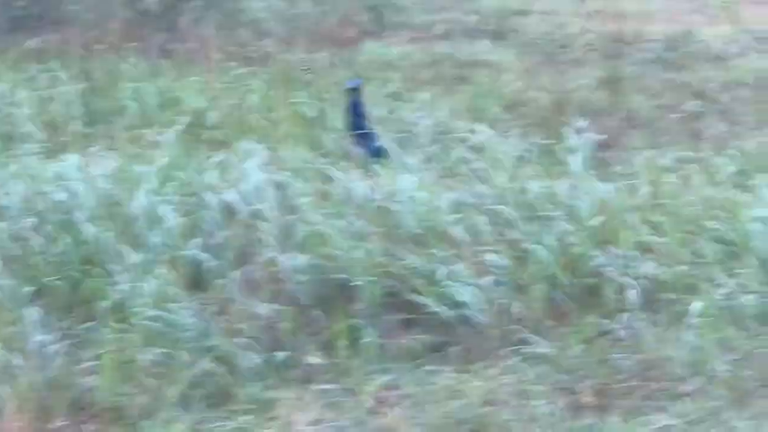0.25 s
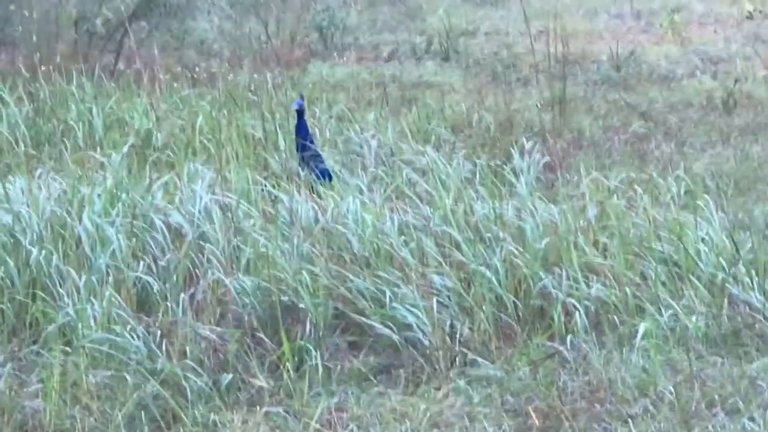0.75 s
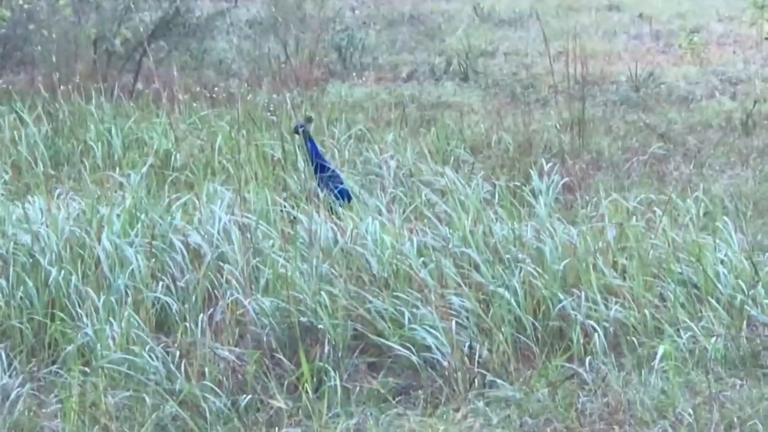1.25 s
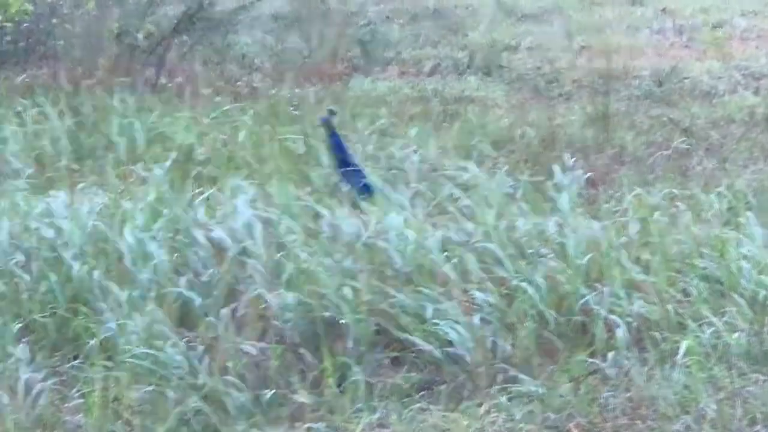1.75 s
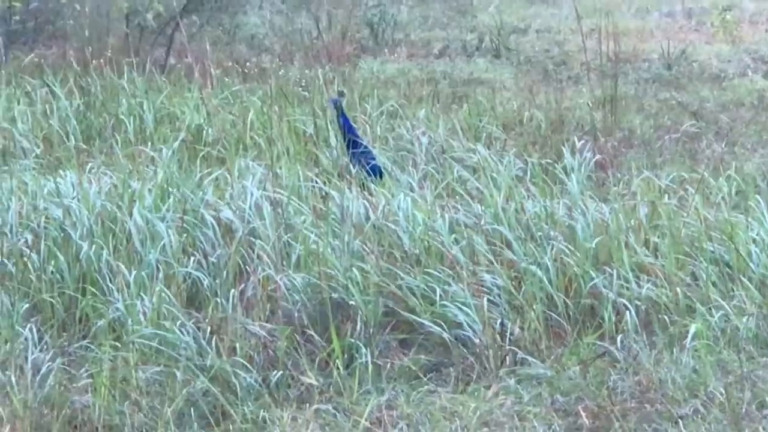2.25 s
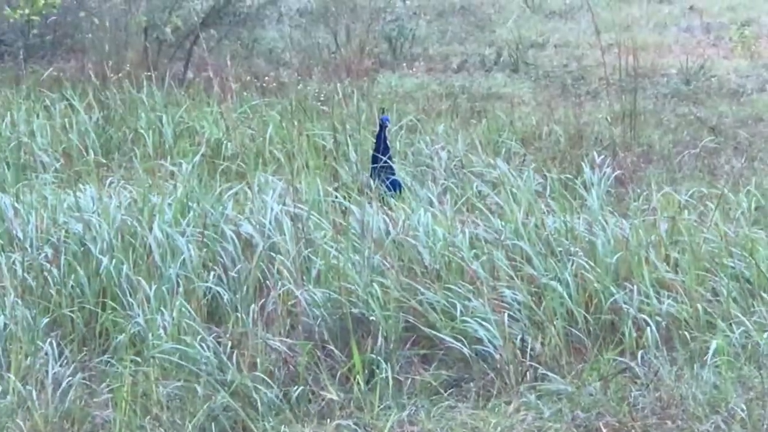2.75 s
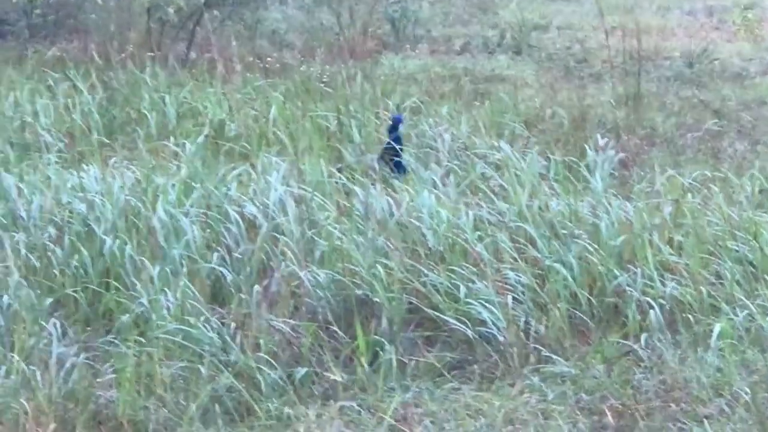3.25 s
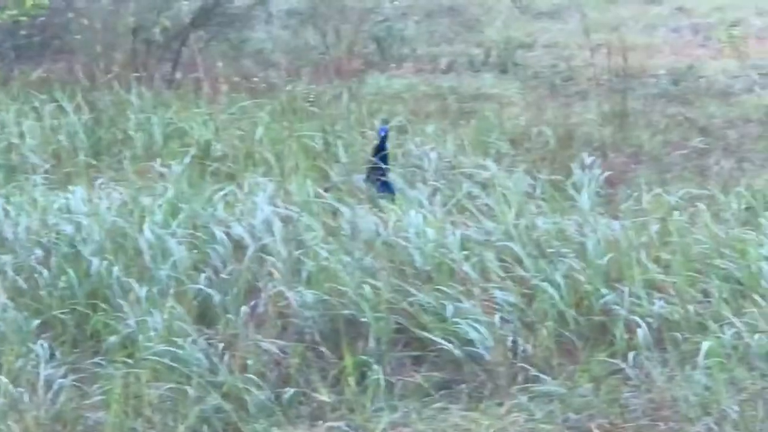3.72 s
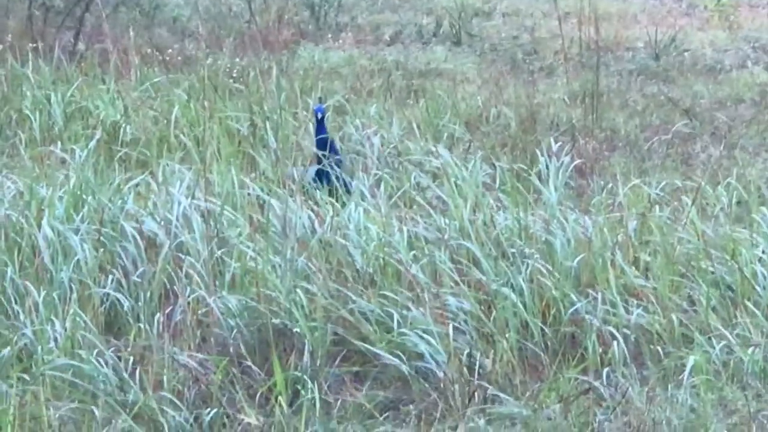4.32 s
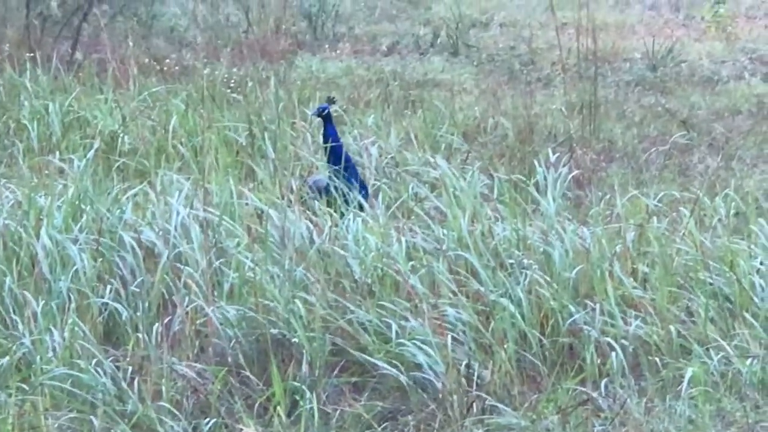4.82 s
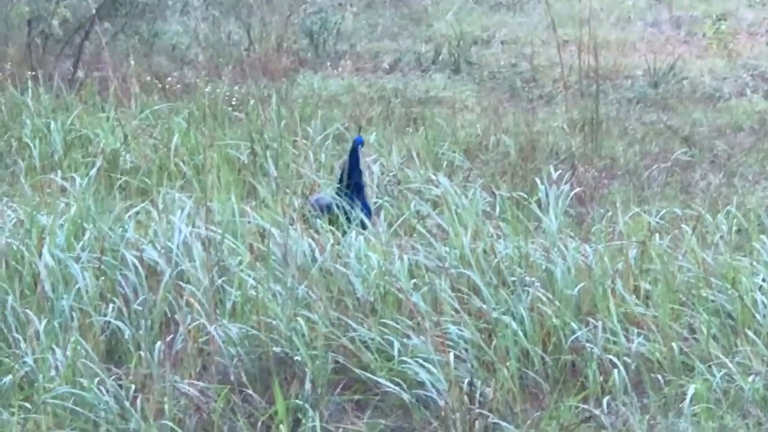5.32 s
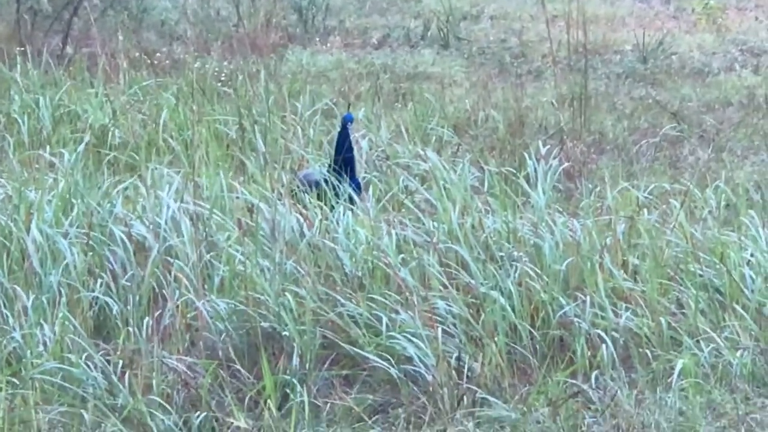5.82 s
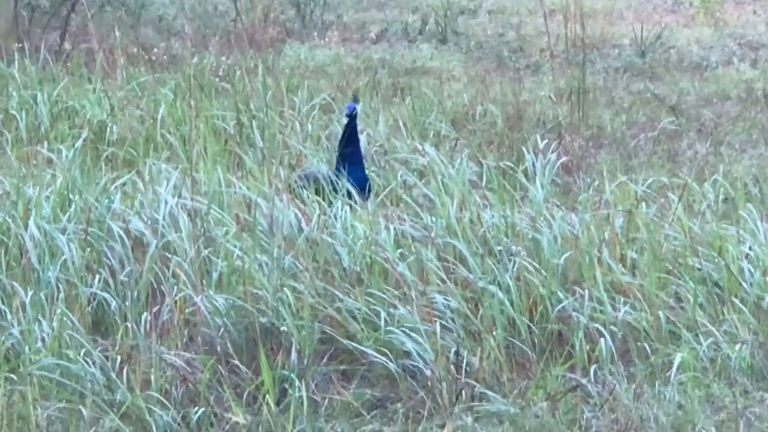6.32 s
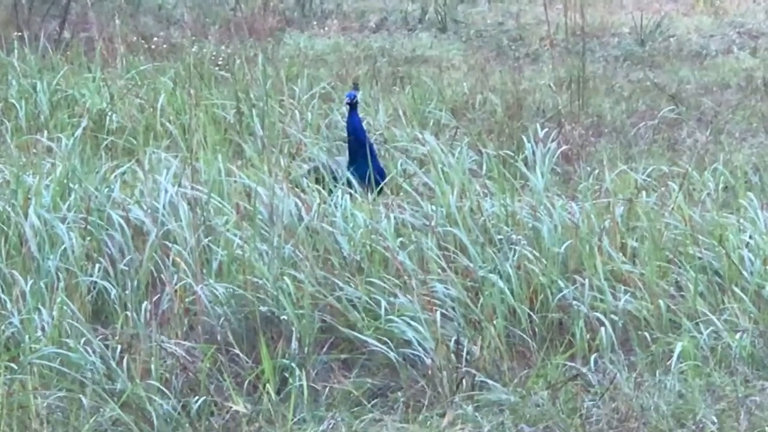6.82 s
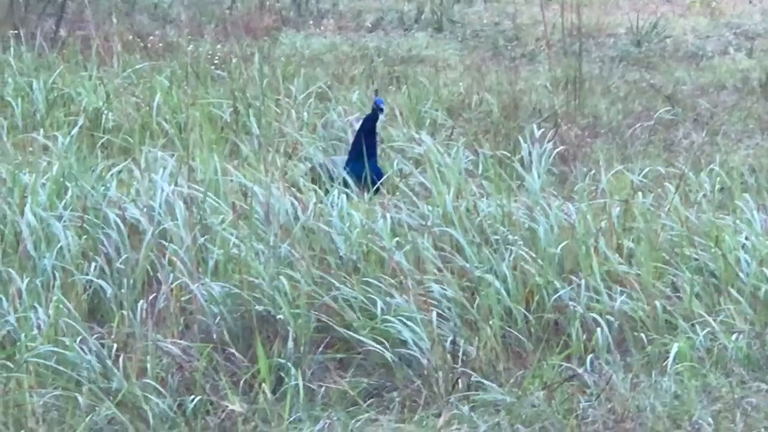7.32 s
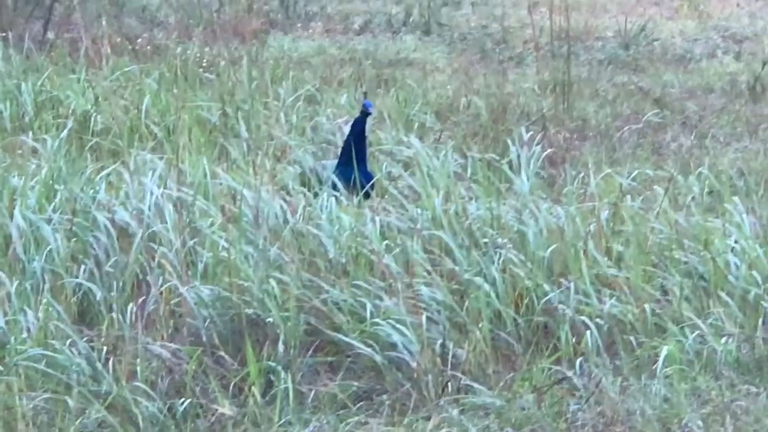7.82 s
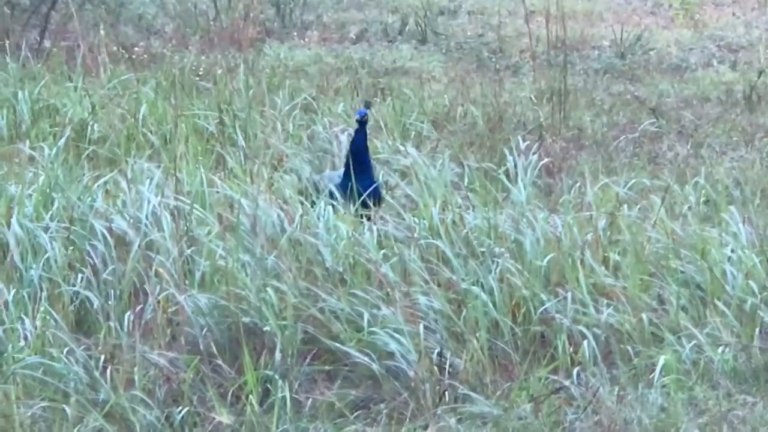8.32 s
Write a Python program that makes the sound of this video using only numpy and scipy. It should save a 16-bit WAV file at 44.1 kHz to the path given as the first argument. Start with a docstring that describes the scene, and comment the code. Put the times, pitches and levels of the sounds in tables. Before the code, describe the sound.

One loud, brief peacock honk rings out near the end and echoes over an open field. Before it, everything is quiet: high, quick bird trills taking turns, thin whistles, raspy screeches from a faraway parrot, soft grass rustles, ticking stalks and one distant bang. A light breeze and a faint engine hum lie underneath, with the microphone staying in one place outdoors.

```python
"""First comes the dying echo of a peacock's honk, over faint air, a far engine and rustling grass.
Small birds trill, whistle and hoot, a distant parrot screeches through its opening beak,
dry stalks tick, and something bangs once. Near the end the peacock gives one loud honk:
its voice box snaps shut over and over, each snap rings its throat, and the field echoes the call."""
import sys
import numpy as np
from scipy import signal
from scipy.fft import rfft, irfft, next_fast_len
from scipy.io import wavfile
from scipy.ndimage import uniform_filter1d, map_coordinates

SR = 44100
rng = np.random.default_rng(int(sys.argv[2]) if len(sys.argv) > 2 else 0)


def master_out(mix):
    """Clip the mix to full scale and print it as 16-bit PCM to the path in sys.argv[1]."""
    frames = np.transpose(np.atleast_2d(mix))
    ceiling = np.clip(frames, -1, 1)
    pcm = np.round(ceiling * 32767).astype(np.int16)
    wavfile.write(sys.argv[1], SR, pcm)


N = 377496


def amp(db):
    """Turns decibels into a number to multiply by."""
    return 10 ** (np.asarray(db) / 20)


def unit(x):
    """Scales a sound to an average (rms) level of 1."""
    return x / np.sqrt(np.mean(x ** 2) + 1e-20)


def at_hz(points, hz):
    """Looks up a curve at hz, blending between rows by octaves."""
    f, value = np.transpose(points)
    return np.interp(np.log(hz + 1), np.log(f + 1), value)


def at_time(points, t):
    """Looks up a curve at t seconds."""
    return np.interp(t, *np.transpose(points))


def ramp(t, start, length):
    """Rises in a straight line from 0 to 1."""
    return np.clip((t - start) / length, 0, 1)


def add(mix, s, sound):
    """Mixes a sound in at s seconds; what falls outside is dropped."""
    start = round(s * SR)
    sound = sound[max(-start, 0):]
    part = mix[max(start, 0):][:len(sound)]
    part += sound[:len(part)]


def wander(size, hz):
    """A smooth random wobble, up to about hz times a second."""
    n = next_fast_len(size + SR // 4)
    f = np.fft.rfftfreq(n, 1 / SR)
    return unit(irfft(rfft(rng.standard_normal(n)) * np.exp(-(f / hz) ** 2), n))[:size]


def colour(x, points):
    """Shapes the tone with (Hz, dB) points; every pulse rings after it strikes."""
    log_gain = np.log(amp(at_hz(points, abs(np.fft.fftfreq(4096, 1 / SR)))))
    ring = np.fft.ifft(np.exp(np.conj(signal.hilbert(log_gain)))).real
    return signal.oaconvolve(x, ring[:len(ring) // 2])[:len(x)]


def noise(size, points):
    """Noise of level 1, its tone shaped by (Hz, dB) points."""
    return unit(colour(rng.standard_normal(size), points))


def sway(x, delay_s=.000025, rate_hz=12):
    """Moving air keeps changing the length of an echo's path, which blurs its tones."""
    wobble = delay_s * SR * wander(len(x), rate_hz)
    return map_coordinates(x, [np.arange(len(x)) + wobble], order=3)


# Echoes from scrub and trees. Each row: delay in seconds, level in dB, smear in seconds.
ECHOES = [(.012, -14, 0.015), (.06, -15, 0.056), (.17, -22, 0.036), (.4, -33, 0.03)]
# How long the field rings. Each row: frequency in Hz, fade time in seconds (shorter dies sooner).
FIELD_FADE = [(200, 0.34), (1200, 1.95), (3300, 1.044), (6000, 0.9), (11000, 0.81), (16000, 0.36)]
# The tone of the echo. Each row: frequency in Hz, gain in dB.
FIELD_TONE = [(200, -1), (600, -2.5), (1400, -5.5), (4000, 2), (15000, -2.5)]

def field_echo(x, wash_db=-27):
    """Scrub and trees send back smeared echoes over a thin wash; far paths lose their treble."""
    t = np.arange(2 * SR) / SR
    paths = amp(wash_db) * np.sqrt(10 / SR) * rng.standard_normal(len(t)) * (1 - np.exp(-t / .02))
    for delay, db, smear in ECHOES:
        cluster = rng.standard_normal(len(t)) * np.exp(-t / smear)
        add(paths, delay, amp(db) * cluster / np.linalg.norm(cluster))
    hz, s, bands = signal.stft(paths, SR, nperseg=256)
    fade_s = at_hz(FIELD_FADE, hz)[:, None]
    loss_db = 60 * s * (1 / fade_s - 1 / fade_s.max())
    bands = bands * amp(at_hz(FIELD_TONE, hz)[:, None] - loss_db)
    late_fade = amp(-12 * np.maximum(t - .5, 0))
    return signal.fftconvolve(x, signal.istft(bands, SR, nperseg=256)[1][:len(t)] * late_fade)


# The tone of the air. Each row: frequency in Hz, relative level in dB.
AIR_TONE = [(12, -45), (20, -43.5), (44, -1), (81, -2), (162, -9.5), (214, -13), (431, -21), (586, -22.5),
            (1240, -25), (3310, -37), (5460, -31), (7430, -34.5), (15800, -34.5)]

def air(db=-54):
    """Open air: a steady low rumble with a faint hiss."""
    tone = amp(at_hz(AIR_TONE, np.fft.rfftfreq(N, 1 / SR)))
    return amp(db) * unit(irfft(rfft(rng.standard_normal(N)) * tone, N))


# The breeze swells, then lulls. Each row: time in seconds, level in dB.
BREEZE_LEVELS = [(0, -58), (3.5, -58), (4.3, -55), (5, -62), (8.5, -59)]

def breeze():
    """Wind in the grass makes a soft, uneven rush."""
    rush = noise(N, [(60, -11.5), (170, 5.5), (400, -.5), (1000, -7.5), (3300, -7.5),
                     (6000, -18), (15000, -30)])
    return amp(at_time(BREEZE_LEVELS, np.arange(N) / SR) + wander(N, 5)) * rush


# How loud the far engine is. Each row: time in seconds, level in dB.
ENGINE_LEVELS = [(0, -53.5), (.7, -51), (2.8, -55), (3.6, -60), (6.4, -62.5), (7.1, -52), (8.5, -63)]

def engine(hz=95):
    """A far engine drones on one low note that wavers in pitch and strength."""
    phase = 2 * np.pi * np.cumsum(hz * (1 + .049 * wander(N, .834))) / SR
    drone = unit((1 + .98 * wander(N, 15)) * np.sin(phase) + 1.05 * wander(N, 21.5) * np.cos(phase))
    return amp(at_time(ENGINE_LEVELS, np.arange(N) / SR)) * drone


# Rustles in the grass. Each row: middle in seconds, level in dB.
RUSTLES = [(.05, -53), (.27, -59.5), (.39, -60), (.53, -57.5), (.91, -56.5), (3.24, -57.5), (3.46, -60.5),
           (3.62, -55), (4.07, -52.5), (4.5, -60), (6.36, -55.5)]

def rustles(length_s=.17, grain_db=3):
    """Blades of grass brush together in short grainy swishes."""
    out, n = np.zeros(N), int(length_s * SR)
    for s, db in RUSTLES:
        grains = rng.standard_normal(n) * amp(grain_db * wander(n, 200))
        swish = unit(colour(grains, [(400, 0), (1000, -4.5), (2800, 2.5), (5000, -18), (15000, -27)]))
        add(out, s - length_s / 2, amp(db) * swish * np.hanning(n))
    return out


# Ticking stalks. Each row: start in seconds, body and edge levels in dB before their boosts.
STALK_TICKS = [(1.2745, -39.5, -43), (1.6018, -50, -51), (1.793, -57, -43.5), (2.1526, -54, -43),
               (3.291, -41, -47), (3.4013, -48.5, -43.5), (3.854, -53, -47), (4.6391, -53, -42),
               (4.8096, -65, -38), (7.114, -58, -47)]

def stalk_ticks(decay_s=.0022, body_boost_db=4, edge_boost_db=6):
    """Dry stalks snap with a short body and a bright edge."""
    out, t = np.zeros(N), np.arange(SR // 20) / SR
    for s, body_db, edge_db in STALK_TICKS:
        body = noise(len(t), [(200, -5), (700, -5.5), (3000, -6), (6000, -16)])
        edge = noise(len(t), [(2000, -12), (4500, -5), (7000, -3), (10000, -6.5), (15000, 1.5)])
        snap = amp(body_db + body_boost_db) * body + amp(edge_db + edge_boost_db) * edge
        add(out, s, snap * np.exp(-t / decay_s))
    return out


# Soft knocks. Each row: start in seconds, level in dB, ring in Hz, click in dB relative to the ring.
KNOCKS = [(.163, -39, 393, -2.5), (3.47, -38.5, 402, -13), (4.227, -42, 980, -9)]

def knocks():
    """Something close by is bumped: it clicks and briefly rings low."""
    out, t = np.zeros(N), np.arange(SR // 20) / SR
    for s, db, hz, click_db in KNOCKS:
        click = noise(len(t), [(300, 2), (1200, 1), (3500, -.5), (6000, -16)]) * np.exp(-t / .0049)
        ring = np.sin(2 * np.pi * hz * t) * np.exp(-t / .0038)
        add(out, s, amp(db) * (ring + amp(click_db) * click))
    return out


# The tone of the bang. Each row: frequency in Hz, relative level in dB.
BANG_TONE = [(30, -16), (100, 4), (400, -16.5), (1500, -12.5), (2200, -3.5), (4000, -11.5), (5100, -21.5),
             (12000, -42)]

def bang(start_s=3.9185, crack_db=-31, tail_db=-39):
    """A distant bang: a short crack, then scatter from the ground."""
    out, t = np.zeros(N), np.arange(SR) / SR
    fade = amp(crack_db - 60 * t / .05) + amp(tail_db - 60 * t / .3)
    attack = 1 - np.exp(-t / .0012)
    add(out, start_s, noise(SR, BANG_TONE) * fade * attack)
    return out


def bird_note(length_s, start_hz, end_hz, rough, bend=1, cracked=0, quaver_hz=220):
    """One held or gliding note; a cracked one adds tones at one and two thirds of its pitch."""
    n = int(length_s * SR)
    glide = start_hz + (end_hz - start_hz) * np.linspace(0, 1, n) ** bend
    phase = 2 * np.pi * np.cumsum(glide + quaver_hz * rough * wander(n, 450)) / SR
    undertones = .6 * np.sin(phase / 3) + np.sin(2 * phase / 3)
    tone = np.sqrt(2) * (np.sin(phase) + cracked * undertones)
    rasp = noise(n, [(start_hz / 4, -12), (start_hz, 0), (start_hz * 2, -25)])
    return unit(tone + rough * rasp) * signal.windows.tukey(n, .6)


# Whistles that flick down. Each row: start in seconds, level in dB.
FALLING_WHISTLES = [(.661, -58), (.8, -67), (6.399, -59.5), (8.398, -63)]
# Whistles that slide up. Each row: start in seconds, level in dB.
RISING_WHISTLES = [(.685, -64.5), (2.42, -70), (4.04, -64.5)]
# Short hoarse chirps. Each row: start in seconds, level in dB, pitch in Hz.
CHIRPS = [(1.857, -55, 3790), (2.246, -55, 3700), (2.33, -64, 3840), (5.357, -54, 3470),
          (8.052, -53.5, 3720), (8.505, -60, 3460)]
# Low hoots. Each row: start in seconds, level in dB, pitch in Hz.
HOOTS = [(6.539, -55.5, 1230), (6.719, -63, 1395), (7.04, -55, 1325), (8.1, -55.5, 1285)]

def distant_birds(echo_db=12):
    """Single whistles, chirps and hoots echo across the field."""
    out = np.zeros(N)
    for s, db in FALLING_WHISTLES:
        add(out, s, amp(db) * bird_note(.044, start_hz=5550, end_hz=3900, rough=.15, bend=2.4))
    for s, db in RISING_WHISTLES:
        add(out, s, amp(db) * bird_note(.135, start_hz=3550, end_hz=5400, rough=.18, bend=1.05))
    for s, db, hz in CHIRPS:
        add(out, s, amp(db) * bird_note(.045, hz, hz, rough=.48, cracked=1))
    for s, db, hz in HOOTS:
        add(out, s, amp(db) * bird_note(.12, hz, hz, rough=.31))
    return out + amp(echo_db) * field_echo(out)[:N]


# Two birds trill in turn. Each row: start in seconds, length in seconds, distance (0 near, 1 far).
TRILLS = [(.35, .352, 0), (.732, .265, 1), (1.459, .38, 0), (1.867, .25, 1), (2.542, .352, 0),
          (2.924, .351, 1), (3.555, .352, 0), (4.152, .406, 1), (4.574, .38, 0), (5.36, .22, 1),
          (5.59, .411, 0), (6.45, .376, 1), (6.826, .407, 0), (7.927, .469, 0)]

def trills(stroke_s=.015, spacing_s=.0292, sweep=.081, octave_db=-5, echo_db=22):
    """Small birds repeat one quick falling stroke, starting softer and lower."""
    direct, to_echo = np.zeros(N), np.zeros(N)
    progress = np.linspace(0, 1, int(stroke_s * SR))
    for start, length, distance in TRILLS:
        db, hz = -52 - 11.5 * distance, 6030 - 520 * distance  # the far bird is fainter and sings lower
        echo_share = .099 + .45 * distance
        fall = 1 + sweep * (1 - distance / 2) * np.cos(np.pi * progress)
        for i, s in enumerate(np.linspace(start, start + length, round(length / spacing_s) + 1)):
            held_back = np.exp(-i / 1.2)
            pitch = hz * (1 - .044 * held_back + .0026 * rng.standard_normal()) * fall
            phase = 2 * np.pi * np.cumsum(pitch) / SR
            tone = np.sin(phase) + amp(octave_db) * (1 - progress) ** 2 * np.sin(2 * phase)
            stroke = amp(db - 5 * held_back + rng.standard_normal()) * np.sin(np.pi * progress) * tone
            add(direct, s - stroke_s / 2, (1 - echo_share) * stroke)
            add(to_echo, s - stroke_s / 2, echo_share * stroke)
    return direct + amp(echo_db) * field_echo(to_echo)[:N]


def resonate(x, hz, width):
    """Lets through a band of sound around the moving frequency hz."""
    turn, decay = np.exp(2j * np.pi * np.cumsum(hz) / SR), np.exp(-np.pi * width / SR)
    return 2 * (turn * signal.lfilter([1 - decay], [1, -decay], x / turn)).real


# Where the parrot's throat rings. Each row: Hz before the beak lowers it, width in Hz, gain in dB.
PARROT_THROAT = [(1040, 330, -6), (2410, 760, 0), (3185, 1480, -5.5), (4020, 310, -4.5), (4750, 520, 0.5),
                 (9720, 810, -12.5), (13500, 2800, -20.5)]
# Screeches. Each row: start and length in seconds, level in dB, top pitch in Hz, roughness from 0 to 1.
SCREECHES = [(1.09, 0.51, -50.5, 562.3, 0.64), (2.591, .51, -50.5, 580, 0.68), (4.419, 0.41, -61, 553, 0.9),
             (5.609, .6, -50, 586, .7), (8.078, 0.21, -55.5, 532, 0.66)]

def parrot(jitter=.0405, rasp_size=.72, flutter_db=1, muffle_db=5.5, tremble=.026, echo_db=8):
    """Unsteady pulses and rasp ring the throat, which rings higher and brighter as the beak opens."""
    out = np.zeros(N)
    beak_start, beak_open, beak_end = .57, .934, .9  # these multiply the throat's frequencies
    for s, length, top_db, top_hz, harshness in SCREECHES:
        t, hold = np.arange(0, length, 1 / SR), .6 * length
        shut, closing = 1 - ramp(t, 0, .061), ramp(t, hold, length - hold)
        beak = beak_open + (beak_start - beak_open) * shut + (beak_end - beak_open) * closing
        beak += tremble * wander(len(t), 25)
        # the voice climbs, then falls, fades and clears as the beak closes
        hz = top_hz * (1 - .17 * (1 - ramp(t, 0, hold)) ** 2 - .11 * closing)
        db = top_db - 10.5 * closing
        rough = np.clip(harshness * (1 - .417 * (shut + np.sqrt(closing))), 0, 1)
        cycles = np.cumsum(hz * (1 + jitter * rough * wander(len(t), 131.6))) / SR
        pulses = unit(sum(np.cos(2 * np.pi * k * cycles) for k in range(1, 27)))
        buzz = (1 - rough) * pulses + rasp_size * rough * rng.standard_normal(len(t))
        voice = np.zeros(len(t))
        for ring_hz, width, gain_db in PARROT_THROAT:
            ring = resonate(resonate(buzz, ring_hz * beak, width), ring_hz * beak, width)
            voice += amp(gain_db - muffle_db * shut * np.log2(ring_hz / PARROT_THROAT[0][0])) * ring
        voice = unit(voice * amp(flutter_db * wander(len(t), 110)))
        add(out, s, amp(db) * voice * signal.windows.tukey(len(t), .1))
    return out + amp(echo_db) * field_echo(out)[:N]


def honk_effort(attack_s=.013, lead_s=.042, swell_s=.012, hold_s=.108, release_s=.056, arch_db=2.26):
    """Times, and dB below full voice: a soft lead-in, a quick swell, an arched hold, a release."""
    full_s = lead_s + swell_s
    t = np.arange(0, full_s + hold_s + release_s, 1 / SR)
    lead_in = 17 * (1 - ramp(t, 0, attack_s)) + (8.5 - arch_db) * (1 - ramp(t, lead_s, swell_s))
    arch = arch_db * (2 * ramp(t, full_s, hold_s) - 1) ** 2
    release = 24.5 * ramp(t, full_s + hold_s, release_s) ** 1.84
    return t, lead_in + arch + release


def voice_box(cycles, hz, slack_db, opens_at=.5716, bounce_s=.000421):
    """The voice box snaps shut once a cycle and opens with a softer, duller pulse."""
    k = np.arange(2, 80)[:, None]  # each overtone is k times the pitch
    soft = .7 / (1 + (k * hz / 3200) ** 4)
    opening = soft * np.exp(-2j * np.pi * k * opens_at)
    overtones = np.exp(2j * np.pi * k * cycles) * (1 + opening) / (1 + soft)
    # a bounce off the ground arrives just after, upside down and without its top
    bounce = -.25 * np.exp(-2j * np.pi * k * hz * bounce_s) / (1 + (k * hz / 8000) ** 4)
    # a weaker push gives blunter pulses
    blunting = amp(-.66 * slack_db * np.clip(np.log2(k * hz / 1500), 0, 2))
    return unit(((overtones * (1 + bounce)).real * blunting).sum(0))


def grass_scatter(voice):
    """Stirring grass blades scatter the treble into the gaps between pulses."""
    blades = noise(SR // 100, [(1500, -18), (4000, -4.5), (8000, -2.5)])
    scattered = signal.oaconvolve(voice, 2 * blades / np.linalg.norm(blades))[:len(voice)]
    return sway(scattered, delay_s=.000022, rate_hz=35)


# The tone of the peacock's throat. Each row: frequency in Hz, gain in dB.
PEACOCK_THROAT = [(400, -28.5), (600, -19.5), (810, -17), (1030, -7.5), (1440, -4), (1650, -1), (2000, -5),
                  (2500, -9), (2900, -4.5), (3300, 1), (3600, -3.5), (4120, -5.5), (4900, -12.5),
                  (6000, -8.5), (6700, -11), (8500, -15.5), (10200, -19.5), (12700, -16), (15800, -21)]

def honk(db=-12, top_hz=207.5, scoop_hz=33.98, scoop_s=.029, jitter=.058):
    """Pulses and breath ring the throat. The pitch scoops up; a slack push makes it lower and rougher."""
    t, drop_db = honk_effort()
    slack_db = np.minimum(drop_db, 14)
    hz = top_hz - scoop_hz * np.exp(-t / scoop_s) - .5 * drop_db
    rough = np.clip(.025 + .04 * drop_db, 0, 1)
    cycles = np.cumsum(hz * (1 + jitter * rough * wander(len(t), 170))) / SR
    puffs = unit(rng.standard_normal(len(t)) * (.45 + np.exp(-(cycles % 1) / .25)))
    breath = amp(-.25 * slack_db) * rough * puffs
    voice = colour(voice_box(cycles, hz, slack_db) + breath, PEACOCK_THROAT)
    for _ in range(2):  # the low tones lag behind the sharp edge of each pulse
        voice = signal.lfilter([-.5, 1], [1, -.5], voice)
    voice = voice + amp(-12) * grass_scatter(voice)
    voice = voice / np.sqrt(uniform_filter1d(voice ** 2, size=640) + 1e-12)  # evens out the level
    chest = amp(-18 + .5 * slack_db) * np.sqrt(2) * np.sin(2 * np.pi * cycles)
    return amp(db - drop_db) * (voice + chest) * signal.windows.tukey(len(t), .02)


def peacock(start_s=7.229, echo_db=-.36, earlier_s=-.66, earlier_db=-7):
    """The honk and its echoes, with the last echoes of the honk before."""
    out, call = np.zeros(N), honk()
    add(out, start_s, call)
    add(out, start_s, amp(echo_db) * sway(field_echo(call)))
    add(out, earlier_s, amp(earlier_db) * sway(field_echo(call)))
    return out


def scene():
    """Everything in the field, heard from one spot."""
    birds = peacock() + parrot() + trills() + distant_birds()
    return (birds + rustles() + stalk_ticks() + knocks() + bang() + air() + breeze() + engine())[None]


def record(dry):
    """Clips the loudest peaks, then cuts the very highest treble."""
    treble_cut = signal.firwin(511, 15970, window=("kaiser", 9), fs=SR)
    return signal.oaconvolve(np.clip(dry, -1, 1), treble_cut[None], "same")


dry = scene()
out = record(dry)
master_out(out)
```